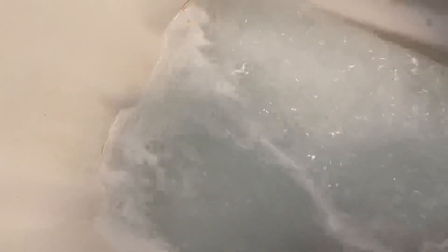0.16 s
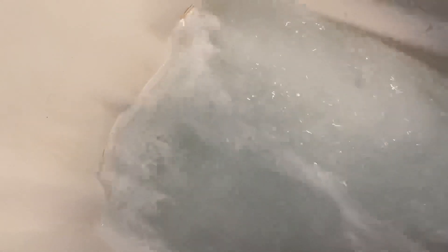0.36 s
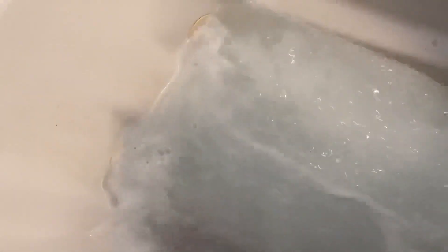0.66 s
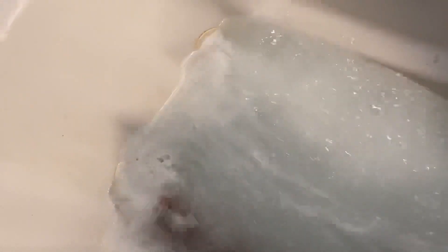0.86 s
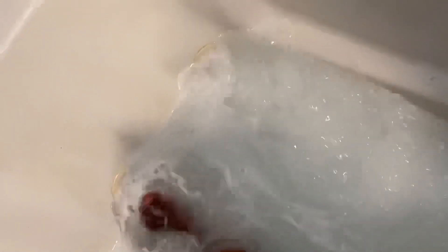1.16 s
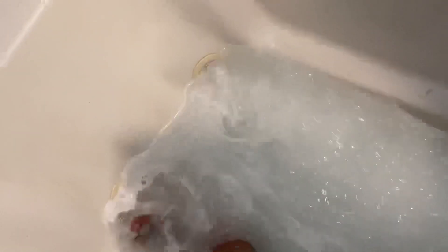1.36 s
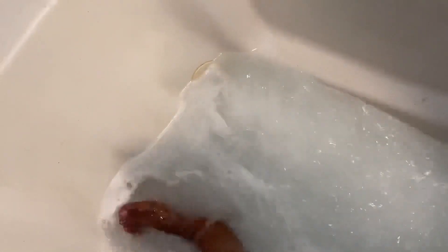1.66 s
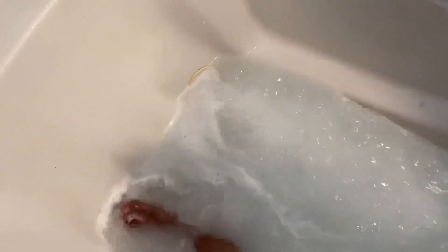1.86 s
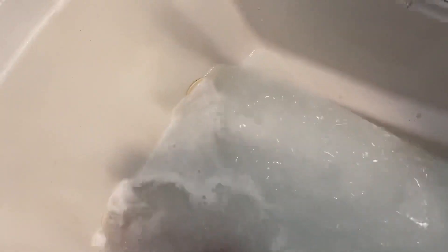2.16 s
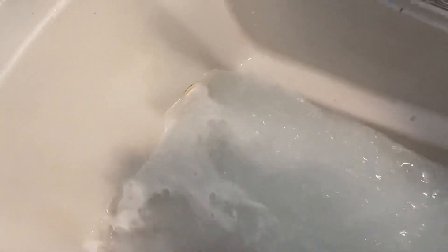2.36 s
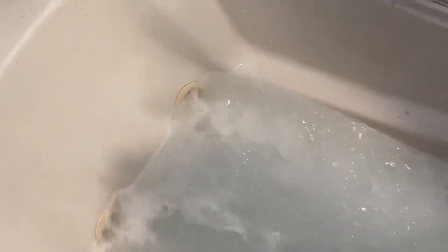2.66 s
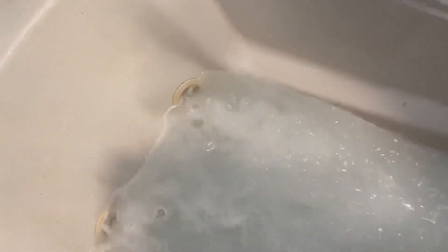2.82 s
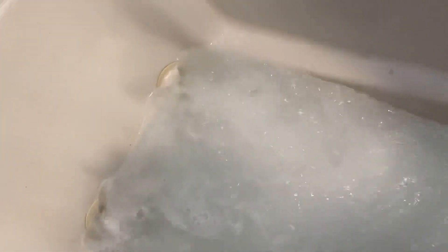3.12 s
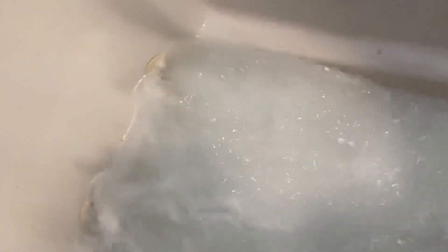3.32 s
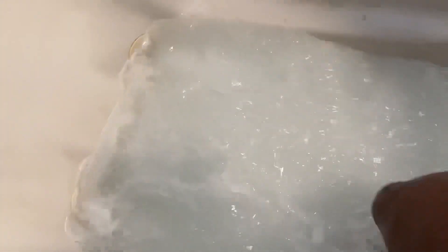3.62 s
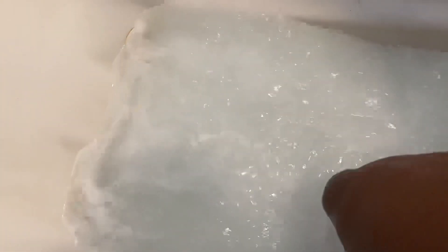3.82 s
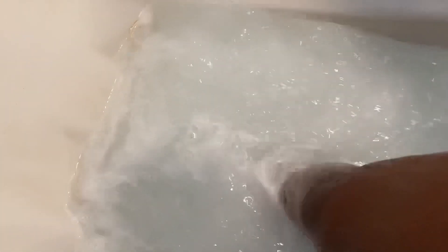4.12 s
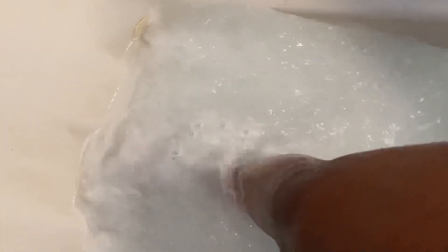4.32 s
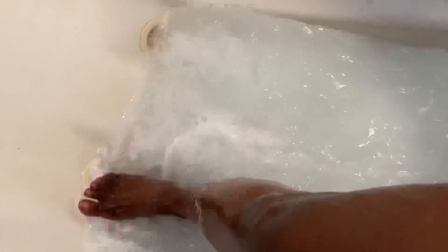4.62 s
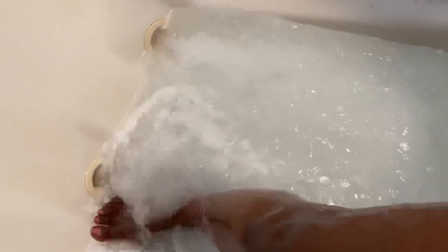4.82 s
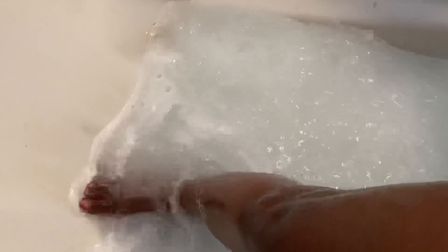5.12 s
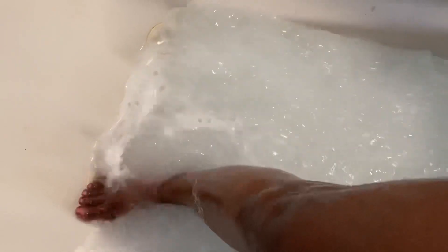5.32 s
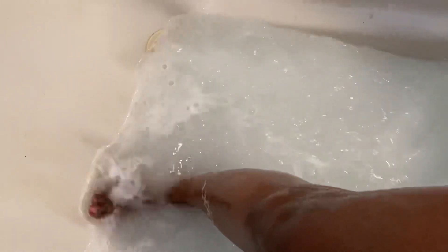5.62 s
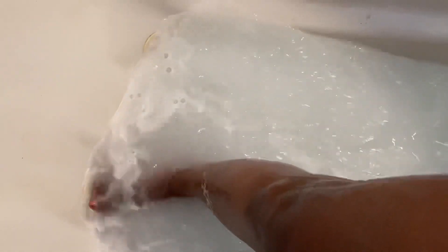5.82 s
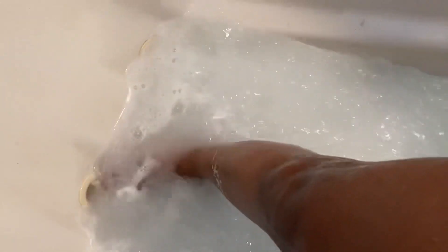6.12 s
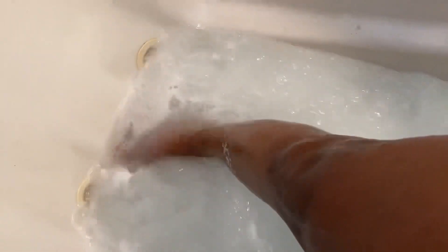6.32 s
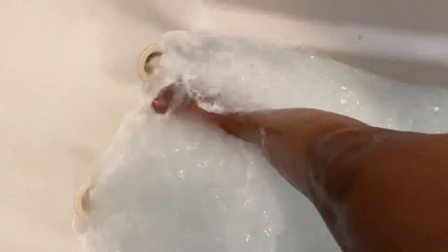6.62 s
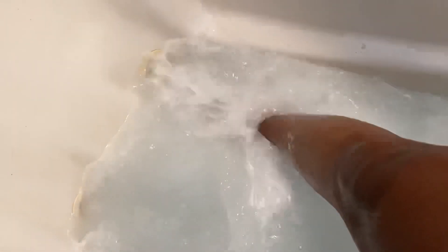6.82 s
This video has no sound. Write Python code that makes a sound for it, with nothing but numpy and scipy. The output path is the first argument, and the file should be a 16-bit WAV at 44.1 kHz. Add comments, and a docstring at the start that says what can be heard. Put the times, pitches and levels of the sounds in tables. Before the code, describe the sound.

A whirlpool bathtub rumbles and hums steadily while the water bubbles, with a foot splashing through it in the second half.

```python
"""A low rumble and hum fill a small bathroom: a whirlpool bath is running. Turbulent jets drive the
modes of tub and room, and the pump's induction motor hums through the tub. The churned surface hisses,
bubbles and spits, most of all when a foot breaks through it. The microphone drifts from one place to
another through the standing waves, so the modes change their balance."""
import sys
import numpy as np
from scipy import signal
from scipy.fft import rfft, irfft, next_fast_len
from scipy.io import wavfile
from scipy.ndimage import uniform_filter1d, map_coordinates

SR = 44100
rng = np.random.default_rng(int(sys.argv[2]) if len(sys.argv) > 2 else 0)


def output_pcm(signal):
    """Save a mono or channel-first signal as 16-bit PCM at the path in sys.argv[1].

    Samples are clipped to [-1, 1] before scaling.
    """
    pcm = np.clip(np.atleast_2d(signal).T, -1, 1) * 32767
    wavfile.write(sys.argv[1], SR, np.round(pcm).astype(np.int16))


N = 307442

# Modes of tub and room. Each row: frequency and width in Hz, relative dB at first and second place.
TUB_MODES = [(56.6, 11.1, 0, -1.5), (90.2, 7.4, -4, 1), (104.4, 7.3, -6.5, -13), (136, 15, -1.5, -5),
             (167.2, 5.5, -6.5, -7.5), (232.7, 11, -9.5, -28), (268.2, 12.1, -9, -1.5),
             (305, 13.4, -11, -4), (334, 24, -9.5, -19.5), (343, 5.8, -9.5, -2), (375.2, 10.3, -6, -5.5),
             (426.7, 14.2, -11.5, -19), (492.3, 23, -16.5, -11), (531.4, 24, -18.5, -14.5),
             (575, 36, -30, -13), (608, 20, -20, -14), (698.4, 22.4, -19, -14)]
# Noise floor between the modes. Each row: frequency in Hz, relative spectral level in dB.
MODE_FLOOR = [(30, -44), (60, -12.5), (75, -16), (100, -21), (176, -10.5), (188, -15.5), (400, -20),
              (460, -36), (560, -23.5), (800, -30.5), (1200, -60.5)]
# Strength of the jets. Each row: time in seconds, level in dB of the low and of the upper modes.
JET_LEVELS = [(0, -20.5, -26), (.8, -20.5, -26.5), (1.4, -19.5, -27), (2.15, -21, -28), (3.1, -20.5, -26),
              (3.9, -21.5, -25.5), (4.4, -18, -25.5), (5.0, -21, -26), (5.35, -19, -25), (5.55, -23, -22.5),
              (5.75, -19, -24), (6.35, -20, -25), (6.7, -21, -23.5), (6.97, -19.5, -24)]
# Motor tones. Each row: mains order, shaft order, level in dB at first and second place,
# left over right in dB, phase lead of the left in radians.
PUMP_TONES = [(0, 1, -36.5, -28, -0.5, -0.5), (2, 0, -26, -22.5, 0, 0.57), (4, 0, -37, -46.5, 2, -2),
              (0, 5, -36.5, -26.5, 1, 0.77), (6, 0, -30.5, -42, -3.5, 0.06), (8, 0, -47, -40.5, -1, 2),
              (0, 10, -46, -49, 1, 2.4)]
# Waves and the foot break the surface. Each row: peak time in seconds, added churn and added spray
# in dB relative to steady, slosh level in dB, rise and fall time constants in seconds.
SPLASHES = [(1.3, -4, 0.5, -54.5, 0.35, 0.37), (2.85, -4, -2, -50, 0.21, 0.21),
            (3.06, 1, 2.5, -55, 0.31, 0.18), (4.68, 2.5, 5, -55, 0.26, 0.23),
            (4.82, 9, 14.5, -34, 0.044, 0.08), (5.0, 1, 9, -41.5, 0.14, 0.25),
            (6.45, 1, 6.5, -41, 0.2, 0.29), (6.68, 4.5, 7, -36, 0.15, 0.11),
            (6.78, -0.5, -1, -47, 0.08, 0.1)]
# Hiss of churned water and of fine spray. Each row: frequency in Hz, relative spectral level in dB.
CHURN_SPECTRUM = [(500, -40), (750, -5), (950, 3), (1260, 0.5), (1900, -2.5), (2600, -8.5), (3400, -8.5),
                  (5300, -13.5), (7500, -22.5), (9500, -40), (12000, -58)]
SPRAY_SPECTRUM = [(3000, -36.5), (6000, 3), (7300, 7), (8300, 5), (9400, 0.5), (12500, -0.5), (14000, -2),
                  (15700, -2.5)]
# Bubble pitches that a splash favours. Each row: frequency in Hz, width in Hz, gain in dB.
SLOSH_PEAKS = [(950, 90, 4.5), (1200, 100, 8.5), (1645, 180, 6), (2100, 170, 4.5), (2780, 220, 7.5),
               (3450, 200, 3)]
# Prominent bubbles. Each row: start in seconds, level in dB, pitch in Hz, life in cycles.
PLOPS = [(0.184, -35, 1300, 27), (0.5815, -28, 5600, 22), (0.7487, -24, 1020, 27), (0.823, -28, 7700, 29),
         (1.106, -18.5, 3640, 29), (1.3119, -19.5, 1230, 14), (1.8981, -30, 6470, 26),
         (2.0434, -22.5, 1180, 15), (2.4627, -24, 1856, 36), (2.907, -22, 1790, 34),
         (3.0355, -33, 2900, 32), (3.0697, -14.5, 2130, 16), (3.0889, -34, 2100, 19),
         (4.4947, -23.5, 2030, 31), (4.526, -22, 990, 28), (4.5655, -27, 2950, 20), (4.6724, -24, 2030, 28),
         (4.682, -22, 2050, 22), (4.718, -28, 2240, 34), (4.6733, -20, 6400, 17), (4.7195, -23, 1200, 40),
         (4.7344, -21.5, 2300, 39), (4.771, -26, 1184, 100), (4.8096, -21.5, 1160, 48),
         (4.8085, -21, 4120, 12), (4.808, -20.5, 2710, 20), (4.812, -20, 2130, 40),
         (4.8289, -20, 1650, 110), (4.849, -25, 1700, 32), (4.8832, -16, 6300, 15), (4.852, -25, 970, 30),
         (4.9227, -21.5, 1250, 30), (4.9231, -22, 2100, 14), (4.946, -26, 1700, 30),
         (4.9317, -24, 3460, 52), (4.9587, -26, 1710, 33), (4.9964, -26, 2200, 40), (4.997, -19, 5600, 17),
         (4.996, -22, 4720, 17), (5.002, -28, 3200, 12), (5.0563, -20.5, 4500, 18), (5.0575, -26, 1750, 44),
         (5.081, -21, 3580, 14), (5.134, -26, 1700, 18), (5.1662, -17.5, 2400, 17), (5.1671, -24, 1500, 18),
         (5.2116, -29, 1090, 20), (5.5902, -29, 4700, 15), (5.756, -25, 2120, 32), (6.0382, -28, 1220, 20),
         (6.216, -27, 1660, 20), (6.4143, -26, 1020, 20), (6.4318, -26, 3580, 20), (6.5201, -25, 2100, 24),
         (6.556, -25, 2130, 49), (6.659, -23, 2770, 30), (6.679, -30, 1630, 35), (6.668, -22, 2050, 33),
         (6.6866, -21, 4200, 16), (6.6886, -23, 6200, 19), (6.703, -26, 1660, 21), (6.718, -22, 2930, 47),
         (6.7494, -27, 2770, 45), (6.772, -20, 2780, 30), (6.79, -28, 2780, 40), (6.96, -25, 2100, 26)]
# Bursting drops. Each row: start in seconds, level in dB, gain of the lower band in dB.
SPITS = [(0.275, -29.5, 8.5), (0.3311, -26, -15), (0.633, -25.5, 5), (0.7766, -34, -9), (1.1049, -27, -6),
         (1.1653, -31, 11), (1.2555, -33, 6), (1.285, -29, 1), (1.3089, -31, -7), (1.774, -16, -2.5),
         (1.938, -29, 9), (2.548, -32, -11), (2.8789, -32, -7), (3.0006, -35, 5), (3.3528, -28, -15),
         (3.4052, -38, 10), (4.2164, -25, -1), (4.696, -27, -2), (4.774, -27, -5), (4.8055, -31, -1),
         (4.8843, -29, 4), (4.907, -28, 2), (4.996, -26.5, 0), (5.0464, -27, -7), (5.113, -24, -8),
         (5.3028, -27, -11), (5.5912, -33, -4), (5.61, -32, -8), (6.23, -31, -4), (6.439, -34, 3),
         (6.444, -21, 2), (6.472, -30, 3), (6.5216, -33, 3), (6.609, -34, 4), (6.6273, -30, -8),
         (6.688, -28, 7), (6.7316, -29, -6), (6.772, -31, 7), (6.9242, -34, -8)]
# Cavity above the water. Each row: frequency and width in Hz, gain in dB at first and second place.
HOLLOW_MODES = [(820, 100, 3, 3.5), (1050, 67, 0.5, 1.3), (1230, 140, 1.8, 0.5), (1660, 160, 0.3, 2),
                (1830, 96, 2.5, -1.5), (2050, 270, -1, 4.5), (2400, 350, 2, -1.1), (2770, 330, 2, 1.5)]
# Decay of the room. Each row: frequency in Hz, reverberation time in seconds.
ROOM_T60 = [(500, .3), (3000, .22), (12000, .11)]
# Microphone path. Each row: time in seconds, fraction of the way to the second place.
MIC_PATH = [(0, 0.087), (1.5, 0.04), (2.2, 0.085), (2.6, 0.23), (3.1, 0.25), (4, 0.59), (5, 0.81),
            (6.97, 0.86)]
# Likeness of the two microphone ports. Each row: frequency in Hz, coherence from 0 to 1.
PORT_COHERENCE = [(40, .999), (150, .99), (250, .88), (400, .85), (520, .5), (900, .35), (1400, .15),
                  (2000, .3), (3000, .35), (4500, .33), (6200, .6)]
# Phase between the ports. Each row: frequency in Hz, lead of the left in half cycles.
PORT_LEAD = [(40, .1), (100, .14), (160, .25), (400, .15), (700, -.35), (1000, -.25), (1800, .14),
             (3000, -.2), (5200, -.25), (6300, -.03)]
# Balance of the ports. Each row: frequency in Hz, left over right in dB.
PORT_BALANCE = [(60, -1.8), (110, -1.0), (200, -0.5), (380, 2.9), (700, 1.0), (1290, 2.0), (2380, -0.3),
                (4400, -2.0), (8120, 0.5), (15000, 0.0)]
# Short waves arrive in step or opposed. Each row: frequency in Hz, coherence, left lead in half cycles.
PORT_TREBLE = [(6800, .65, .1), (7800, .75, .65), (8400, .99, 1), (9650, .99, 1), (10300, .8, 1.3),
               (11000, .8, 1.6), (11800, .995, 2), (13000, .995, 2), (13300, .8, 2.35), (14200, .8, 2.65),
               (14600, .998, 3)]


def jets(split_hz=186):
    """Forced resonance: turbulence excites the modes, and each place weights them differently."""
    low_db, upper_db = curves(JET_LEVELS)
    hz, width, *place_levels = np.transpose(TUB_MODES)[..., None]

    def spectrum(f, db):
        mode_power = np.sum(amp(2 * db) * resonance(f, hz, width) ** 1.14, axis=0)  # steepened skirts
        return np.sqrt(mode_power + amp(2 * along(MODE_FLOOR, f)))

    turbulence, rumble = patchy_noise(0.73), 0
    for upper, level_db in ((False, low_db), (True, upper_db)):
        band = crossfade(*(filtered(turbulence, lambda f: ((f > split_hz) == upper) * spectrum(f, db))
                           for db in place_levels))
        running_rms = np.sqrt(np.abs(uniform_filter1d(np.mean(band ** 2, axis=0), size=SR // 3)))
        rumble = rumble + amp(level_db) * band / running_rms  # the jets push evenly
    return rumble


def pump(mains_hz=60.005, shaft_hz=57.77, sway_db=2.6, flutter_db=2.2):
    """Magnetic forces hum at even mains orders; the shaft, slowed by slip, turns five impeller vanes."""
    t, hum = np.arange(N) / SR, 0
    side = np.array([[.5], [-.5]])
    for mains, shaft, first_db, second_db, pan_db, lead in PUMP_TONES:
        hz = round(mains) * mains_hz + round(shaft) * shaft_hz
        level_db = crossfade(first_db, second_db)
        level_db += sway_db * wobble(6.5) + flutter_db * wobble(16)  # the water load wavers
        wander_rad = (.6 if shaft else .15) * wobble(4) + .45 * wobble(18)
        phase = 2 * np.pi * (hz * t + rng.random()) + wander_rad + side * lead
        hum = hum + np.sqrt(2) * amp(level_db + side * pan_db) * np.sin(phase)
    return hum


def surface(steady_churn_db=-37.5, steady_spray_db=-50):
    """Incoherent sources add in power: each splash swells and ebbs on top of the steady water noise."""
    peak_s, *levels, rise_s, fall_s = np.transpose(SPLASHES)[..., None]
    late = np.arange(N) / SR - peak_s
    swell = np.exp(-2 * np.where(late < 0, -late / rise_s, late / fall_s))
    churn_power, spray_power, slosh_power = (np.sum(amp(2 * db) * swell, axis=0) for db in levels)
    churn_db, spray_db = 10 * np.log10(1 + churn_power), 10 * np.log10(1 + spray_power)
    surge = amp(0.59 * wobble(14))  # all bands swell together
    water = amp(steady_churn_db + churn_db) * churn(churn_db)
    water += amp(steady_spray_db + spray_db + 1.3 * wobble(7.4)) * spray()
    return surge * (water + np.sqrt(slosh_power) * slosh())


def churn(excess_db):
    """Air entrainment: as churning exceeds its steady level, bubbles gain on the hiss and water spatters."""
    air_db = np.clip(excess_db + 2, 0, 12)
    hiss = unit(filtered(patchy_noise(1.25), lambda f: amp(along(CHURN_SPECTRUM, f))))
    fizz = swarm(2000, hz=2300, spread=.38, scatter_db=1.85, cycles=24, glide=.047, limits=(600, 9000))
    gurgles = swarm(500, hz=1250, spread=.25, scatter_db=2.4, cycles=19.5, glide=.038)
    # Thrown water falls back as a brighter hiss and as ticking droplets.
    spatter = unit(filtered(patchy_noise(2.0), lambda f: np.exp(-((f - 4200) / 2100) ** 2)))
    ticks = swarm(700, hz=3790, spread=.3, scatter_db=2.5, cycles=5.3, glide=.05, samples=300)
    return (0.83 * amp(-.3 * air_db) * hiss
            + 0.23 * amp(0.079 * air_db) * bathroom(unit(fizz), wet_db=1)
            + amp(-13) * bathroom(unit(gurgles), wet_db=0)
            + amp(-9) * np.sqrt(np.abs(1 - amp(-2 * excess_db))) * spatter
            + amp(-15) * bathroom(unit(ticks), wet_db=-3))


def slosh():
    """Bubble resonance in bulk: a splash traps a dense crowd of bubbles, some pitches favoured."""
    crowd = swarm(2500, hz=1799, spread=.45, scatter_db=3, cycles=24.4, glide=.08,
                  limits=(700, 6000), samples=760)
    crowd = filtered(crowd, lambda f: amp(sum(db * resonance(f, hz, bw) for hz, bw, db in SLOSH_PEAKS)))
    return bathroom(unit(crowd), wet_db=-1.5)


def spray(count=900):
    """Small sources radiate high frequencies: mist hisses and tiny droplets ring briefly."""
    mist = unit(filtered(patchy_noise(1.1), lambda f: amp(along(SPRAY_SPECTRUM, f))))
    start_s = rng.random(count) * N / SR
    hz = rng.uniform(5500, 14500, count)
    drops = bubbles(start_s, hz, rng.normal(0, 2.2, count), cycles=6.5, glide=.05, samples=200)
    return .9 * mist + .3 * bathroom(unit(drops), wet_db=-4)


def plops():
    """Free oscillation: single bubbles ring out above the churn."""
    start_s, db, hz, cycles = np.transpose(PLOPS)
    return bathroom(bubbles(start_s, hz, db, cycles, glide=0.013), wet_db=-11)


def spits(burst_t60_s=.012, fizzle_t60_s=.14, split_hz=8400):
    """Film rupture: a drop bursts with a snap and a puff of noise, then scattered droplets fizzle out."""
    high, low, t = np.zeros(N + SR), np.zeros(N + SR), np.arange(SR // 5) / SR
    burst = amp(-60 * t / burst_t60_s)
    fizzle = amp(-17 - 60 * t / fizzle_t60_s) * (1 - np.exp(-(t / .011) ** 2))
    envelope = (burst + fizzle) * (1 - np.exp(-t / .0005))
    for start_s, db, lower_db in SPITS:
        crack = amp(db) * envelope * rng.standard_normal(len(t))
        crack[0] = amp(db + 7)  # the film snaps
        high[round(start_s * SR):][:len(t)] += crack
        low[round(start_s * SR):][:len(t)] += amp(lower_db) * crack
    high = filtered(high[:N], lambda f: (f > split_hz) / (1 + (f / 14500) ** 16))
    low = filtered(low[:N], lambda f: (f <= split_hz) / (1 + (4800 / (f + 1)) ** 6))
    return bathroom(high + low, wet_db=-7)


def swarm(count, hz, spread, scatter_db, cycles, glide, limits=(0, np.inf), samples=1500):
    """Superposition: bubbles start at random times, their pitches log-normal about hz."""
    start_s = rng.random(count) * N / SR
    pitches = np.clip(hz * np.exp(rng.normal(0, spread, count)), *limits)
    return bubbles(start_s, pitches, rng.normal(0, scatter_db, count), cycles, glide, samples)


def bubbles(start_s, hz, db, cycles, glide, samples=1500):
    """Damped oscillators: each bubble decays 26 dB in its life of cycles, rising in pitch as it surfaces."""
    t = np.arange(samples)[None] / SR
    age = t * (hz / cycles)[:, None]
    phase = 2 * np.pi * hz[:, None] * t * (1 + glide * np.minimum(age, 1))
    envelope = amp(db)[:, None] * np.exp(-3 * age) * (1 - np.exp(-12 * age))
    index = np.round(start_s * SR).astype(int)[:, None] + np.arange(samples)
    return np.bincount(index.ravel(), (envelope * np.sin(phase)).ravel(), N + samples)[:N]


def hollow(x):
    """Cavity resonance: the tub above the water colours the sound, differently at each place."""
    hz, width, *place_levels = np.transpose(HOLLOW_MODES)[..., None]
    return crossfade(*(filtered(x, lambda f: amp(np.sum(db * resonance(f, hz, width), axis=0)))
                       for db in place_levels))


def bathroom(x, wet_db, delay_samples=420):
    """Reverberation off tiled walls: returns the direct sound with its tail, and an unrelated tail."""
    hz, t, noise = signal.stft(rng.standard_normal((2, SR // 2)), SR, nperseg=256)
    tails = signal.istft(noise * amp(-60 * t / along(ROOM_T60, hz)[:, None]), SR, nperseg=256)[1]
    delayed = np.pad(x, (delay_samples, 0))[None]
    wet = signal.fftconvolve(delayed, tails / np.linalg.norm(tails[0]), axes=1)[:, :N]
    return amp(wet_db) * wet + [x, 0 * x]


def ports(pair):
    """Partial coherence: sum and difference of two sounds reach left and right, offset in level and phase."""
    coherence = PORT_COHERENCE + [row[:2] for row in PORT_TREBLE]
    lead = PORT_LEAD + [row[::2] for row in PORT_TREBLE]
    angle = lambda f: np.arccos(np.clip(along(coherence, f), 0, 1)) / 2
    shared, apart = filtered(pair, lambda f: np.array([np.cos(angle(f)), np.sin(angle(f))]))
    tilt = lambda f: amp(along(PORT_BALANCE, f) / 2) * np.exp(.5j * np.pi * along(lead, f))
    return filtered(np.array([shared + apart, shared - apart]), lambda f: np.array([tilt(f), 1 / tilt(f)]))


def crossfade(first, second):
    """Linear interpolation between the two places along the microphone's path."""
    place = np.clip(curves(MIC_PATH)[0], 0, 1)
    return (1 - place) * first + place * second


def patchy_noise(depth_db):
    """Random modulation: two independent noises share patches of gain in time and frequency."""
    spectra = signal.stft(rng.standard_normal((2, N)), nperseg=512)[2]
    patches = uniform_filter1d(rng.standard_normal(spectra.shape[1:]), size=16, axis=0)
    patches = uniform_filter1d(patches, size=5, axis=1)
    return signal.istft(spectra * amp(depth_db * unit(patches)), nperseg=512)[1][:, :N]


def resonance(f, hz, width):
    """Lorentzian peak of unit height and the given full width at half height."""
    return 1 / (1 + ((f - hz) / width * 2) ** 2)


def filtered(x, response):
    """Linear filtering: the spectrum of x times a complex frequency response."""
    size = next_fast_len(N + SR // 2)
    return irfft(rfft(x, size) * response(np.fft.rfftfreq(size, 1 / SR)), size)[..., :N]


def wobble(rate):
    """Spline through random knots, rate of them a second."""
    return map_coordinates(rng.standard_normal(int(N / SR * 40)), [np.arange(N) * rate / SR])


def curves(rows):
    """Interpolation in time: one value per sample for each column after the first."""
    times, *columns = np.transpose(rows)
    return [np.interp(np.arange(N) / SR, times, column) for column in columns]


def along(points, hz):
    """Interpolation of (Hz, value) points on a logarithmic frequency axis."""
    knots_hz, values = np.transpose(points)
    return np.interp(np.log(hz + 1), np.log(knots_hz + 1), values)


def amp(db):
    """Amplitude ratio of a level in dB."""
    return 10 ** (np.asarray(db) / 20)


def unit(x):
    """Scaling to unit RMS."""
    return x / np.sqrt(np.mean(x ** 2) + 1e-20)


def scene():
    """Superposition of the pump's hum and the sounds of the water, in stereo."""
    return pump() + ports(jets() + hollow(surface()) + plops() + spits())


def record(dry, bass_hz=44, top_hz=15720):
    """Band limiting: the microphone cuts the deepest bass and passes nothing above top_hz."""
    return filtered(dry, lambda f: (f < top_hz) / np.sqrt(1 + (bass_hz / (f + 1)) ** 12))


dry = scene()
out = record(dry)
output_pcm(out)
```